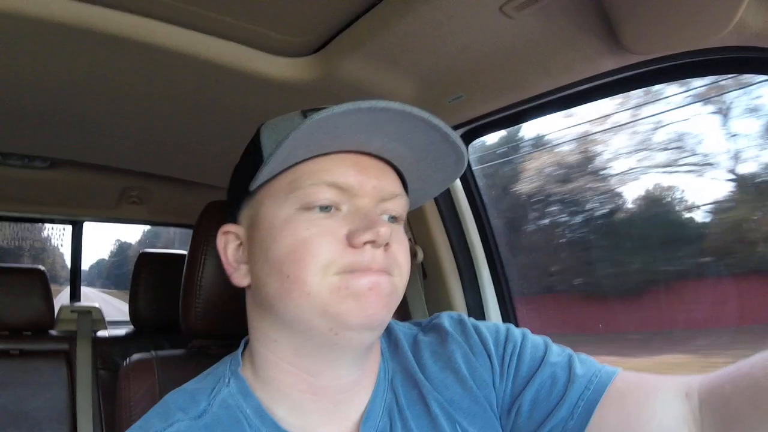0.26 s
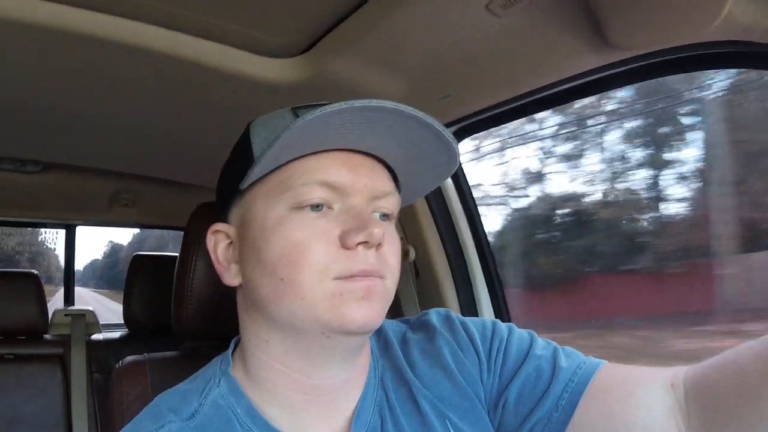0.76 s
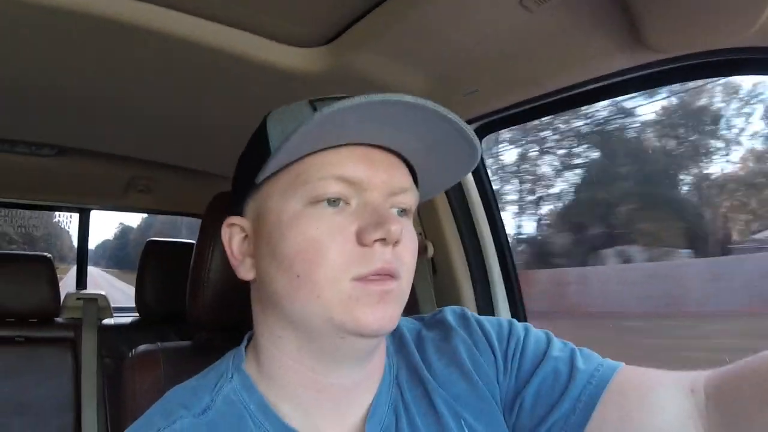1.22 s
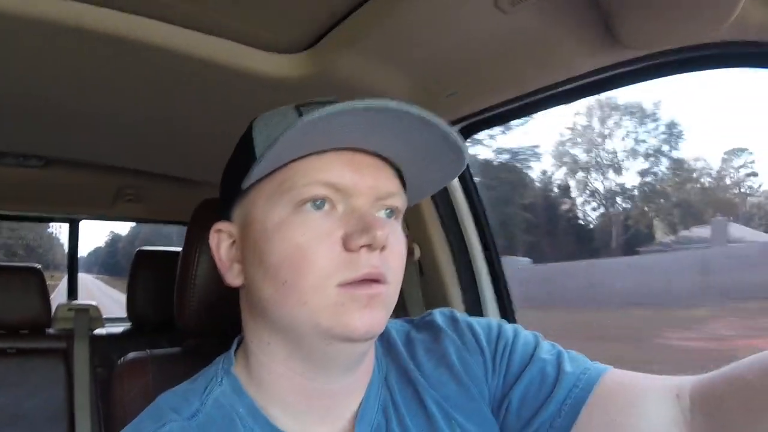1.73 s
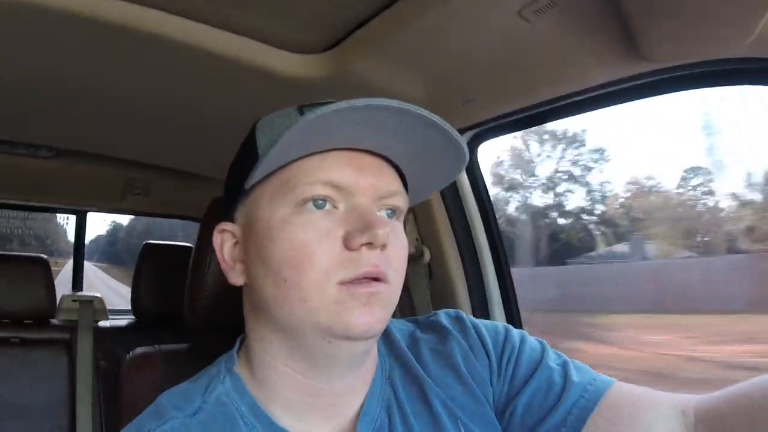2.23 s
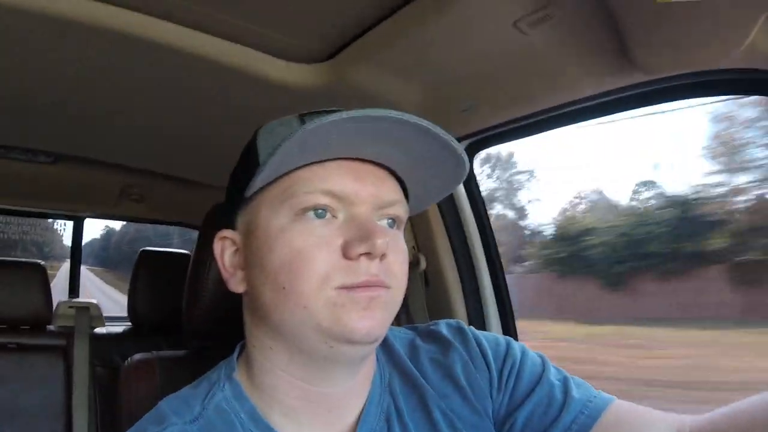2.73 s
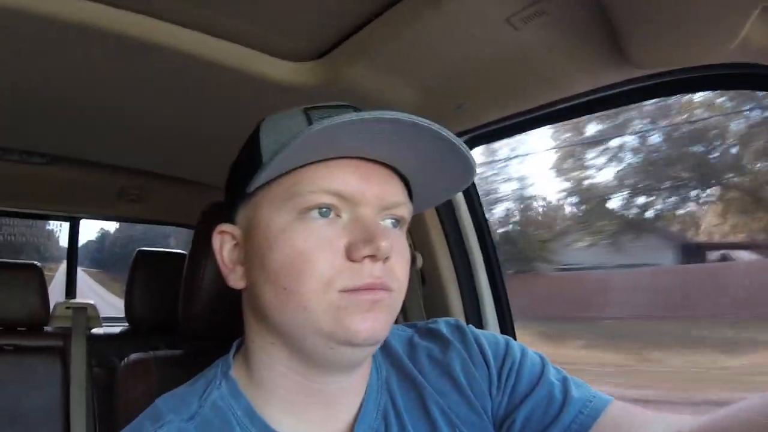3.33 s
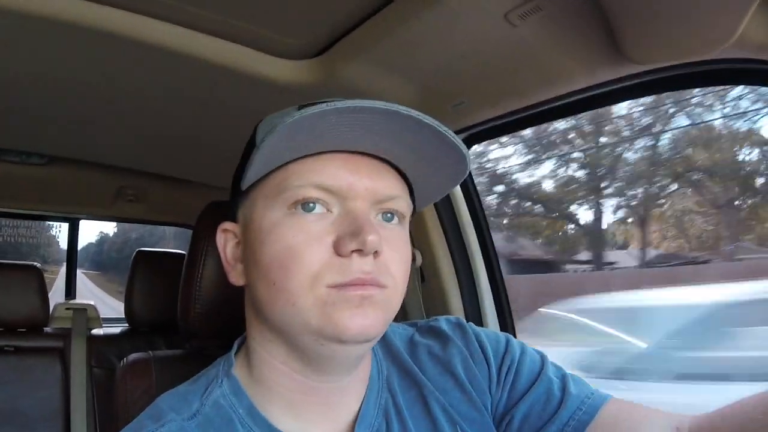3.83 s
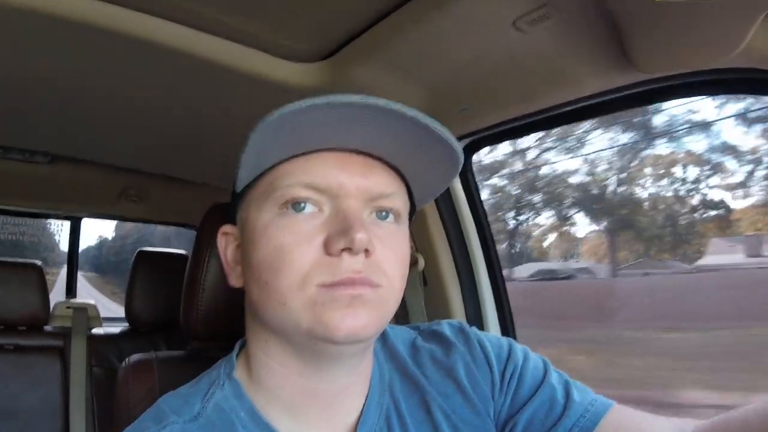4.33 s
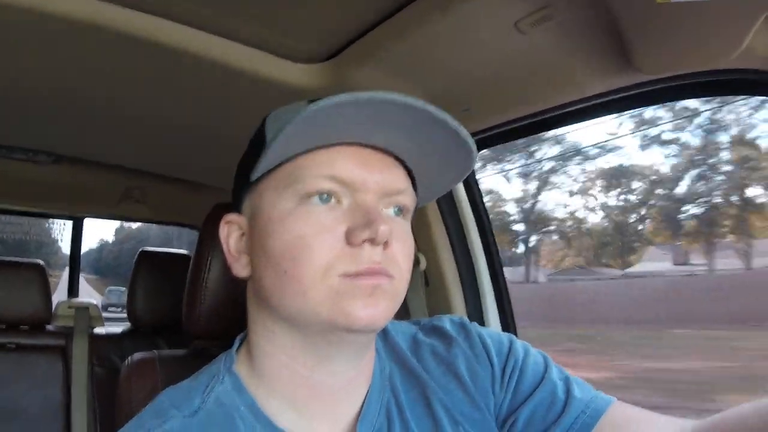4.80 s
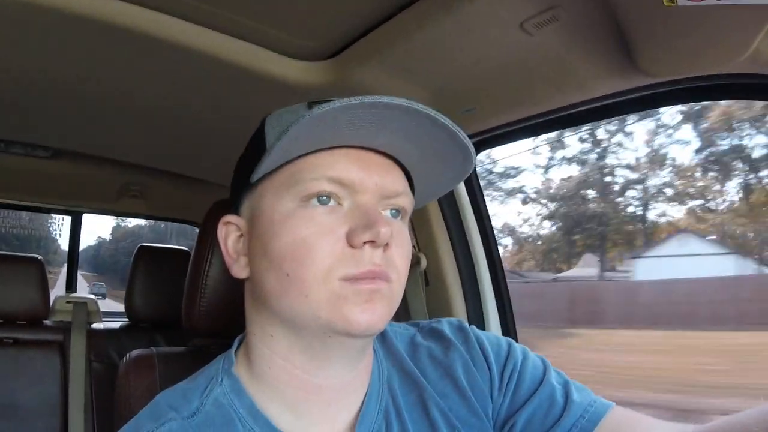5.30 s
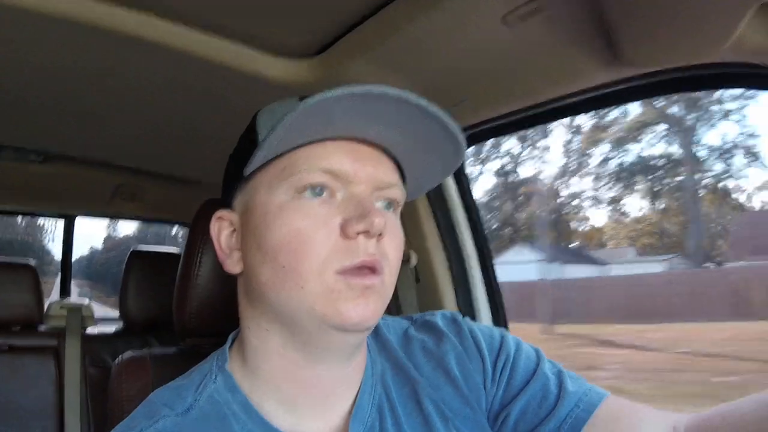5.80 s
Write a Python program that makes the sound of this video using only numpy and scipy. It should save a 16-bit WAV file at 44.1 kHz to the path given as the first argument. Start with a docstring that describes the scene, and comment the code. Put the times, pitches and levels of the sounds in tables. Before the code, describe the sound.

Inside a moving pickup cab, a diesel engine drones, drops in pitch at a gear change, then sinks lower over road rumble and soft indicator ticking.

```python
"""Inside the cab of a diesel pickup that slows for a turn, over road rumble, tyre roar and air hiss.
At first the V8, a sum of cycle harmonics, pulls with clatter and a thin turbo whistle; the flasher relay,
decaying modes with a noise snap, starts to tock and tick. The firing tone swells and drops in pitch at the
upshift, while a steady wheel hum holds on; small noise-burst clicks follow. Then the engine eases off and
sinks towards idle, a narrow tyre moan rises and fades, and bumps and more clicks come near the end."""
import sys
import numpy as np
from scipy import signal
from scipy.fft import rfft, irfft
from scipy.io import wavfile

SR = 44100
rng = np.random.default_rng(int(sys.argv[2]) if len(sys.argv) > 2 else 0)


def unload_wav(signal):
    """Save mono or channel-first audio to the path in sys.argv[1] as 16-bit WAV at rate SR, clipped to [-1, 1]."""
    wavfile.write(
        sys.argv[1],
        SR,
        np.round(np.clip(np.atleast_2d(signal).T, -1, 1) * 32767).astype(np.int16),
    )


N = 266893
T = np.arange(N) / SR


def gain_of(db):
    """Logarithmic level: 20 dB is a factor of ten in amplitude."""
    return 10 ** (np.asarray(db) / 20)


def evened(x):
    """Power normalisation: scales a signal to rms 1."""
    return x / np.sqrt(np.mean(x ** 2) + 1e-20)


def curves(rows):
    """Linear interpolation: each column of a table becomes a curve in time."""
    s, *columns = np.transpose(rows)
    return [np.interp(T, s, column) for column in columns]


def read(points, hz):
    """Spectral interpolation: reads a spectrum in dB on a log-frequency axis."""
    f, value_db = np.transpose(points)
    return np.interp(np.log(hz + 1), np.log(f + 1), value_db)


def add(mix, start_s, sound):
    """Superposition: adds a sound to the mix in place, cut off at the end."""
    part = mix[max(round(start_s * SR), 0):][:len(sound)]
    part += sound[:len(part)]


def filtered_noise(size, gain):
    """Spectral filtering: white noise weighted by a gain at each frequency."""
    return irfft(rfft(rng.standard_normal(size)) * gain, size)


def noise(points, peaks=()):
    """Coloured noise of rms 1: a broad spectrum with resonance peaks raised on it."""
    hz = np.fft.rfftfreq(N, 1 / SR)
    shape_db = read(points, hz)
    for pitch_hz, width_hz, peak_db in peaks:
        shape_db = shape_db + peak_db / (1 + (2 * (hz - pitch_hz) / width_hz) ** 2)
    return evened(filtered_noise(N, gain_of(shape_db)))


def wander(rate_hz):
    """Low-pass random modulation of rms 1, with swings up to about rate_hz."""
    size = 2048
    hz = np.fft.rfftfreq(size, N / SR / size)
    slow = filtered_noise(size, 1 / (1 + (hz / rate_hz) ** 2))
    return np.interp(T, np.linspace(0, T[-1], size), evened(slow))


def cabin(x, wet_db, t60_s=0.11):
    """Reverberation: dense, quickly dying reflections from glass and trim."""
    t = np.arange(6000) / SR
    tail = rng.standard_normal(len(t)) * np.exp(-np.log(1000) * t / t60_s) * (t > .002)
    reflections = signal.fftconvolve(x, tail / np.linalg.norm(tail))[:N]
    return x + gain_of(wet_db) * reflections


# Slow levels of the fine noises: time_s, clatter_db, hiss_db
FINE_LEVELS = [(0, -54.5, -71), (.7, -56.5, -70), (1.1, -58.5, -73), (1.8, -57, -70.5), (3, -57.5, -68.5),
               (3.9, -56.5, -68), (4.4, -59.5, -67.5), (4.8, -63, -66.5), (5.4, -64.5, -67),
               (6.05, -62, -66)]
# Air hiss spectrum: pitch_hz, relative density_db (per Hz)
HISS_SPECTRUM = [(2000, -4.5), (4200, -16.5), (5700, -16.5), (6150, -1), (6480, 6.5), (6950, 0.5),
                 (8000, -2.5), (9100, -4.5), (10300, -26.5), (11600, -12.5), (13000, -20), (14400, -17.5)]


def air():
    """Broadband noise: air hiss with a slightly wavering level."""
    _, hiss_db = curves(FINE_LEVELS)
    return gain_of(hiss_db + .4 * wander(12)) * noise(HISS_SPECTRUM)


# Drive from the road: time_s, rumble_db (only its swing about the mean is used), tyre_db
ROAD_LEVELS = [(0.05, -22, -42.5), (0.23, -28, -41.5), (0.46, -28, -42), (0.66, -23, -41),
               (0.91, -29, -44.5), (1.57, -35.5, -43), (1.72, -30.5, -42.5), (1.87, -30, -42),
               (2.5, -31, -42), (3.13, -32.5, -41), (3.25, -29.5, -41), (3.56, -29, -42),
               (4.19, -26.5, -41), (4.44, -28.5, -42), (4.84, -25.5, -41.5), (5.2, -26.5, -41.5),
               (5.3, -28.5, -40), (5.32, -28, -42.5), (5.72, -27, -43), (5.87, -29, -42.5), (6.0, -28, -43)]
# Body rumble spectrum: pitch_hz, relative density_db (per Hz)
RUMBLE_SPECTRUM = [(7, -26.5), (17, 1.5), (24, 0), (35, 1), (52, -0.5), (68, -14), (95, -11.5),
                   (120, -12.5), (150, -8), (180, -16), (225, -10.5), (260, -15), (300, -20.5),
                   (360, -34.5), (600, -76)]
# Tyre roar spectrum: pitch_hz, relative density_db (per Hz)
TYRE_SPECTRUM = [(250, -24.5), (360, -4), (480, -5.5), (600, -2), (760, -7), (1000, -13.5), (1200, -19),
                 (1400, -23), (2500, -35.5), (6000, -55.5)]
# Standing waves in the cab that colour the tyre roar: pitch_hz, width_hz, peak_db
CAB_STANDING_WAVES = [(431, 49, 5), (525.6, 22, 4.5), (733, 21, 5), (863, 11, 3), (1145, 44, 7)]


def road(body_db=-28.5, follow=0.92, rumble_swell_db=1, tyre_swell_db=0.62):
    """Structure-borne noise: the road shakes the body and the tyres roar through the floor."""
    rumble_db, tyre_db = curves(ROAD_LEVELS)
    rumble_swing_db = follow * (rumble_db - rumble_db.mean())
    body_level_db = body_db + rumble_swing_db + rumble_swell_db * wander(6.1)
    body = gain_of(body_level_db) * noise(RUMBLE_SPECTRUM)
    tyre_level_db = tyre_db + tyre_swell_db * wander(33)
    return body + gain_of(tyre_level_db) * noise(TYRE_SPECTRUM, CAB_STANDING_WAVES)


# Narrow moan in the tyre roar: time_s, level_db
MOAN_LEVELS = [(0, -66), (2.8, -57.5), (4.3, -52), (4.8, -48), (5.3, -44.5), (5.6, -65), (6.05, -60)]


def moan(centre_hz=545, width_hz=30):
    """Narrow-band noise: one resonance gives a fuzzy pitch, rising as the truck slows, then fading."""
    hz = np.fft.rfftfreq(N, 1 / SR)
    resonance = 1 / (1 + (2 * (hz - centre_hz) / width_hz) ** 2)
    level_db, = curves(MOAN_LEVELS)
    return gain_of(level_db) * evened(filtered_noise(N, resonance))


# Bumps in the road that rock the cab: centre_s, level_db (peak), pitch_hz, length_s
BUMP_EVENTS = [(4.983, -25.5, 116.3, 0.07), (5.316, -14.5, 27.23, 0.093), (6.016, -11.5, 26.7, 0.052)]


def bumps():
    """Transient oscillation: each bump swings the cab briefly under a smooth envelope."""
    out = np.zeros(N)
    for centre_s, level_db, pitch_hz, length_s in BUMP_EVENTS:
        t = np.arange(-length_s / 2, length_s / 2, 1 / SR)
        swing = np.hanning(len(t)) * np.cos(2 * np.pi * pitch_hz * t)
        add(out, centre_s - length_s / 2, gain_of(level_db) * swing)
    return out


# Small clicks in the cab: start_s, level_db, centre_hz, width_octaves, rise_s, decay_s
CLICK_EVENTS = [(1.4529, -42.5, 5267, 0.19, 0.00081, .003), (1.463, -58, 5110, 0.3, .003, 0.013),
                (1.47, -48.5, 4560, 0.2, .0006, 0.0015), (5.493, -47.5, 2602, 0.45, 0.0033, 0.012),
                (5.866, -34, 3680, 0.2, 0.00056, 0.0014), (5.867, -63, 6036, 0.35, 0.00052, 0.0021),
                (5.911, -57, 3586, 0.56, .001, .003)]


def clicks():
    """Impulsive noise: short dry bursts, each with one broad resonance."""
    size = 4096
    t, hz, out = np.arange(size) / SR, np.fft.rfftfreq(size, 1 / SR), np.zeros(N)
    for start_s, level_db, centre_hz, width_octaves, rise_s, decay_s in CLICK_EVENTS:
        distance_octaves = np.log2((hz + 1) / centre_hz)
        resonance = 1 / (1 + (distance_octaves / width_octaves) ** 4) ** .5
        shape = (1 - np.exp(-t / rise_s)) ** 2 * np.exp(-t / decay_s)
        burst = evened(filtered_noise(size, resonance))
        add(out, start_s, gain_of(level_db) * shape / shape.max() * burst)
    return out


# Ringing modes of the closing relay: pitch_hz, relative level_db, t60_s
TICK_RING = [(1670, -9, .03), (1762, 6.5, 0.02), (2050, -7.5, 0.023), (4880, -15.5, 0.054),
             (5110, -11, 0.025), (5210, -18.5, 0.023)]
# Ringing modes of the opening relay: pitch_hz, relative level_db, t60_s
TOCK_RING = [(1210, 2, 0.041), (1294, 5, 0.021), (1720, -6.5, .015), (2342, -0.5, 0.032),
             (3650, -12.5, 0.017), (3860, -13, 0.034), (5750, -16, 0.039)]
# Contact chatter around the main closing blow: delay_s, relative level_db
TICK_CHATTER = [(-.0044, -11), (0, 0), (.006, -2)]
# Contact chatter around the main opening blow: delay_s, relative level_db
TOCK_CHATTER = [(-.0092, -6), (-.0046, -5), (0, 0)]
# The relay closes (tick) and opens (tock) once a period
FLASH_PERIOD_S, FIRST_TICK_S, FIRST_TOCK_S = .7593, .701, .3262
TICK_DB, TOCK_DB = -38.5, -43.5


def relay(first_s, level_db, modes, chatter, snap_db, snap_decay_s=0.002, rise_s=0.00057):
    """Modal vibration: each throw is a few quick blows, a dry snap and the ring of the housing."""
    t, out = np.arange(4096) / SR, np.zeros(N)
    ring = np.zeros(len(t))
    for pitch_hz, mode_db, t60_s in modes:
        decay = np.exp(-np.log(1000) * t / t60_s)
        ring += gain_of(mode_db) * decay * np.sin(2 * np.pi * pitch_hz * t)
    band = signal.butter(2, [900, 4500], "band", fs=SR)
    onset = 1 - np.exp(-t / rise_s)
    for throw_s in np.arange(first_s, T[-1], FLASH_PERIOD_S):
        for delay_s, blow_db in chatter:
            hit = evened(signal.lfilter(*band, rng.standard_normal(len(t))))
            snap = gain_of(snap_db) * hit * np.exp(-t / snap_decay_s)
            add(out, throw_s + delay_s, gain_of(level_db + blow_db) * (ring + snap) * onset)
    return out


def flasher():
    """Alternating impacts: the turn signal's ticks and tocks share one period."""
    ticks = relay(FIRST_TICK_S, TICK_DB, TICK_RING, TICK_CHATTER, snap_db=-17.5)
    tocks = relay(FIRST_TOCK_S, TOCK_DB, TOCK_RING, TOCK_CHATTER, snap_db=-8.5)
    return ticks + tocks


# Hum of wheels and driveline: time_s, pitch_hz, level_db
WHEEL_HUM = [(0, 221.5, -43.5), (.6, 222.8, -34), (1.1, 223.7, -44.5), (1.5, 223.5, -43.5), (2, 222.8, -37),
             (2.35, 220.8, -30.5), (2.7, 220.3, -46.5), (3.4, 214.6, -45), (3.9, 211.5, -35.5),
             (4.6, 204.7, -33), (5, 199.2, -40), (5.4, 189.1, -41), (6.05, 164.3, -43.5)]


def wheels(waver=0.16):
    """Rotational tone: the hum follows road speed, so it holds its pitch through the gear change."""
    pitch_hz, level_db = curves(WHEEL_HUM)
    turn = np.exp(2j * np.pi * np.cumsum(pitch_hz) / SR)
    # a complex waver moves both amplitude and phase
    swing = 1 + waver * (wander(12) + 1j * wander(2.4))
    return np.sqrt(2) * gain_of(level_db) * (turn * swing).real


# Turbo whistle: time_s, pitch_hz, level_db
TURBO_WHISTLE = [(0, 5560, -83), (.25, 5550, -78), (.6, 5480, -74.5), (.75, 5500, -85), (.87, 5390, -72.5),
                 (1, 5335, -86), (1.15, 5050, -110)]


def turbo():
    """Frequency-modulated tone: the compressor's whistle wavers, and fades as the load comes off."""
    pitch_hz, level_db = curves(TURBO_WHISTLE)
    phase = 2 * np.pi * np.cumsum(pitch_hz + 6 * wander(30)) / SR
    return gain_of(level_db + wander(25)) * np.sqrt(2) * np.sin(phase)


# Combustion clatter spectrum: pitch_hz, relative density_db (per Hz)
CLATTER_SPECTRUM = [(600, -3.5), (1100, -5.5), (1450, -2.5), (1750, -0.5), (2050, -5), (2800, -5.5),
                    (3400, -12.5), (4100, -13.5), (4650, -23.5), (5100, -17), (5800, -23.5), (9000, -35)]


def clatter(cycles, depth=0.12, uneven=0.044):
    """Amplitude modulation: combustion noise swells with each firing, some harder than others."""
    clatter_db, _ = curves(FINE_LEVELS)
    firing_swell = depth * np.cos(2 * np.pi * 8 * cycles)
    uneven_swell = uneven * np.cos(2 * np.pi * 2 * cycles)
    beat = 1 + firing_swell + uneven_swell
    return gain_of(clatter_db) * evened(noise(CLATTER_SPECTRUM) * beat)


# Engine tones: time_s, firing_hz, firing_db, tenth_db (10th order of the four-stroke cycle)
ENGINE_TONES = [(0.0, 133.7, -20, -45.5), (0.25, 133.8, -18.5, -29), (0.6, 134.4, -19.5, -28.5),
                (0.8, 133, -17.5, -31.5), (0.9, 126.6, -16, -36), (1.0, 119.8, -11, -40),
                (1.1, 109.4, -23.5, -35.5), (1.2, 101.8, -25.5, -43.5), (1.5, 100.9, -23.5, -37.5),
                (1.9, 101.1, -24, -39), (2.3, 100.4, -22.5, -30.5), (2.7, 99, -22.5, -35),
                (3.1, 98.2, -23.5, -30), (3.5, 97.53, -23.5, -35.5), (3.9, 96.47, -24, -28.5),
                (4.3, 94.7, -24.5, -28.5), (4.7, 92.57, -28.5, -29), (5.0, 90.55, -28, -28.5),
                (5.2, 88.9, -29.5, -29.5), (5.4, 81.83, -34.5, -52), (5.6, 76.23, -35.5, -54),
                (5.8, 71.05, -29.5, -55), (6.05, 64.6, -37.5, -58)]
# Engine effort: time_s, load (0-1), side_db (shift of all side orders)
ENGINE_LOAD = [(0, 1, -2.5), (.8, 0.96, 0), (1.1, 0, -1), (1.5, 0, 0), (2.8, 0, 1), (4.1, 0.05, 0.5),
               (4.6, 0.1, -3.5), (5.1, 0.02, -8.5), (5.5, 0, -1.5), (6.05, 0.01, -2)]
# Side orders: order (multiple of the four-stroke cycle rate)
SIDE_ORDERS = [2, 4, 5, 6, 7, 9, 11, 12, 14, 15, 16, 17, 18, 19, 20, 21, 22, 24, 25, 26]
# Side orders under full load: level_db (before side_db and the cab's response)
PULLING_LEVELS = [-26.5, -24.5, -33, -36, -33.5, -49, -38, -50, -54, -40.5, -38.5, -44.5, -48.5, -38.5, -41,
                  -54.5, -59, -57.5, -47, -60]
# Side orders at no load: level_db (before side_db and the cab's response)
COASTING_LEVELS = [-28, -31, -29.5, -33.5, -52.5, -51, -43, -45, -40, -49, -48.5, -59.5, -50.5, -44.5, -45,
                   -42.5, -53, -45.5, -48.5, -45.5]
# How the cab carries the side orders: pitch_hz, response_db
CAB_RESPONSE = [(16, -5.5), (25, 1.5), (60, -2.5), (85, -1), (120, 3.5), (150, -2.5), (185, -3.5), (220, 3),
                (260, 3.5), (300, -1.5), (335, -2.5), (375, -12), (420, -1.5), (460, -8)]


def engine(cycles, firing_hz, waver=.16, shake=0.072, scatter=1.3):
    """Harmonic synthesis: eight firings a cycle make the drone; unequal cylinders add other orders."""
    _, firing_db, tenth_db = curves(ENGINE_TONES)
    load, side_db = curves(ENGINE_LOAD)
    load = np.clip(load, 0, 1)
    angle = 2 * np.pi * cycles
    out = -gain_of(firing_db) * (1 + shake * wander(14)) * np.cos(8 * angle)
    out -= gain_of(tenth_db) * np.cos(10 * angle)
    for order, pulling_db, coasting_db in zip(SIDE_ORDERS, PULLING_LEVELS, COASTING_LEVELS):
        level_db = side_db + coasting_db + load * (pulling_db - coasting_db)
        level_db = level_db + read(CAB_RESPONSE, order * firing_hz / 8)
        # the lowest orders push together; the body scatters the phase of higher ones
        lag = scatter * (order / 10) ** 2 * rng.standard_normal()
        swing = 1 + waver * (wander(7.8) + 1j * wander(11))
        out -= gain_of(level_db) * (swing * np.exp(1j * (order * angle + lag))).real
    return np.sqrt(2) * out


def scene():
    """Superposition: air, road, small sounds with cab reflections, and the engine in one channel."""
    firing_hz = curves(ENGINE_TONES)[0]
    cycles = np.cumsum(firing_hz) / SR / 8  # eight firings a cycle
    rolling = road() + moan() + bumps()
    small_sounds = cabin(clicks(), wet_db=-9) + cabin(flasher(), wet_db=-9.5)
    motor = wheels() + turbo() + clatter(cycles) + engine(cycles, firing_hz)
    return (air() + rolling + small_sounds + motor)[None]


def record(dry):
    """Band limiting: a linear-phase low-pass filter removes the top of the spectrum."""
    low_pass = signal.firwin(511, 14400, window=("kaiser", 9), fs=SR)  # cutoff in Hz
    return signal.oaconvolve(dry, low_pass[None], "same")


dry = scene()
out = record(dry)
unload_wav(out)
```